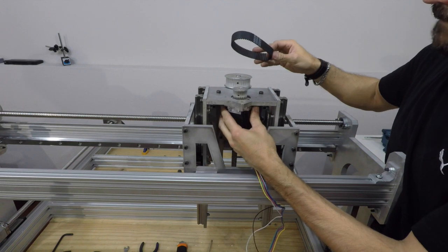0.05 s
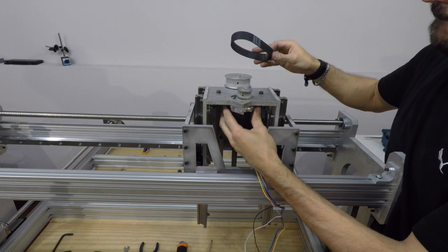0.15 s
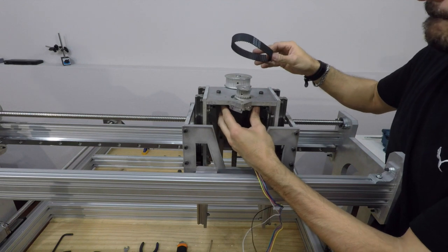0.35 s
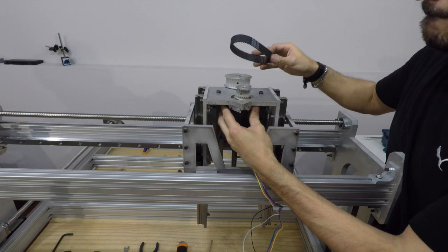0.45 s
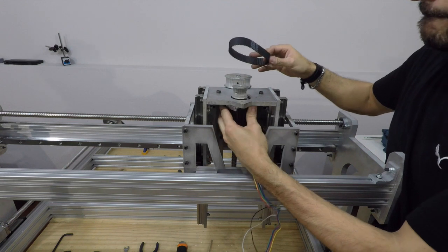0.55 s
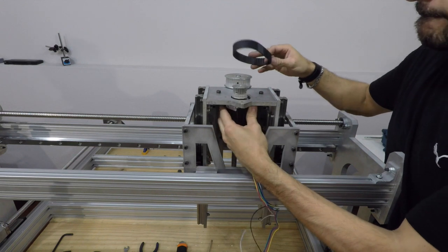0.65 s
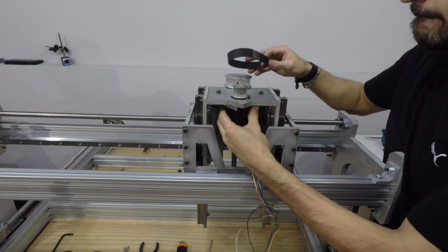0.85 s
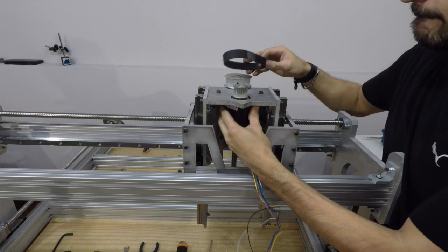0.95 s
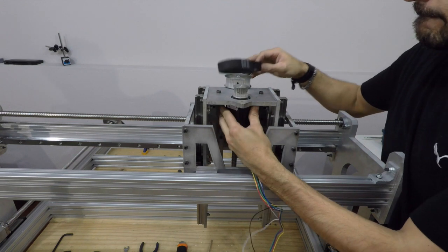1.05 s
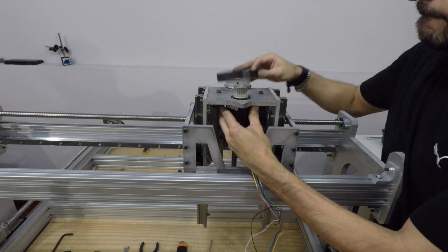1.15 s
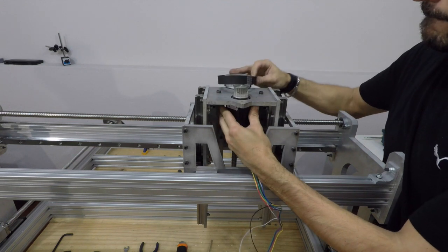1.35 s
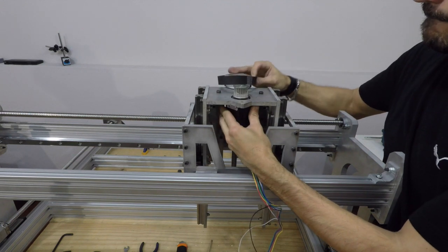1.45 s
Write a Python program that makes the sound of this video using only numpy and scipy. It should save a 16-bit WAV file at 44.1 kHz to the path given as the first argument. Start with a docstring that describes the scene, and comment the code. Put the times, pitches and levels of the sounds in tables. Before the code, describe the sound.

A motor knocks against its metal mount in a quick, uneven run of dull thumps and small clinks that grow weaker. The frame rings briefly after each, heard from a distance in an echoing workshop with a faint rumble.

```python
"""A bare workshop, one microphone, far enough off that the room outweighs the direct sound.
Hands shift a motor against an aluminium machine frame while a toothed belt is brought to its pulley.
Each contact cracks, clinks the mounting plate and sets the heavy frame ringing; the walls answer.
Fingers and the rubber belt brush the metal, mostly near the end, over a low room rumble and hiss."""
import sys
import numpy as np
from scipy import signal
from scipy.fft import rfft, irfft, next_fast_len
from scipy.io import wavfile

SR = 44100
rng = np.random.default_rng(int(sys.argv[2]) if len(sys.argv) > 2 else 0)


def transcribe(signal):
    """Save signal, clipped to [-1, 1], as a 16-bit WAV file at the path in sys.argv[1]."""
    frames = np.atleast_2d(signal).T
    limited = np.clip(frames, -1, 1)
    pcm = np.round(limited * 32767).astype(np.int16)
    wavfile.write(sys.argv[1], SR, pcm)


N = 66150
T = np.arange(int(.8 * SR)) / SR  # time within one event [s]
TOP_HZ = 15300


# Centres of the thump, body, clank, clink and edge bands: (frequency [Hz])
BAND_HZ = [90, 450, 1400, 3300, 8000]
# Motor against its mount: (time [s], thump [dB], body [dB], clank [dB], clink [dB], edge [dB],
# favoured resonance [Hz], its lift [dB])
CONTACTS = [ (0.1646, -27, -28.5, -27, -26.5, -43, 1480, 17),
            (0.1750, -0.5, -16, -30.5, -39, -73, 268, 9.5), (0.2049, -9.5, -13, -23, -28.5, -50, 4100, 3),
            (0.2200, -10, -26.5, -20.5, -47, -70, 2300, 12),
            (0.354, -14, -24, -22.5, -34.5, -51.5, 5130, 9),
            (0.377, -10, -15.5, -34.5, -38.5, -81, 290, 4.5),
            (0.5610, -21, -22, -22.5, -29.5, -49.5, 2950, 5.5),
            (0.584, -23, -14.5, -30, -30, -53.5, 1790, 9.5), (0.6000, -10.5, -26, -41, -59, -64, 129.4, 18),
            (0.6210, -19, -30.5, -40.5, -58, -80, 550, 16),
            (0.7841, -17.5, -23.5, -30.5, -40, -61, 943, 17.5),
            (0.8000, -22.5, -27.5, -39.5, -63, -84, 430, 12.5),
            (1.0151, -20.5, -22.5, -23.5, -38, -59, 1144, 12),
            (1.0184, -17, -17, -24, -45.5, -72, 2040, 16.5),
            (1.259, -27.5, -36, -44, -78.5, -67.5, 514, -2), ]

def motor_knocks():
    """The motor knocks on its mount; how hard and where it lands colours the sound and its ring."""
    out = np.zeros(N)
    for s, *bands_db, favoured_hz, lift_db in CONTACTS:
        crack, clink = contact_crack(), plate_clink()
        direct = near_echoes(crack) + clink
        tail = workshop_reverb(crack + amp(-5) * clink) + frame_ring()  # less plate reaches the room
        colour = [*zip(BAND_HZ, bands_db), (TOP_HZ, bands_db[-1] - 15)]
        lift = lambda hz: lift_db * bell(hz, favoured_hz, octaves=0.13)
        add(out, s, coloured(direct, lambda hz: along(colour, hz) + lift(hz)))
        # Only part of the lift lasts into the long ring.
        add(out, s, coloured(tail, lambda hz: along(colour, hz) + 0.71 * lift(hz)))
    return out


# Spectrum of metal meeting metal: (frequency [Hz], level [dB])
CRACK_SPECTRUM = [(25, -15.5), (70, -13.5), (130, -13), (190, -14), (260, -3), (500, 0), (880, -1.5),
                  (1200, 0.5), (1650, 4.5), (2450, -2.5), (3200, 2), (4500, 2), (6200, -1), (9000, -1.5)]

def contact_crack():
    """The impact itself, a burst of noise that dies quickly."""
    burst = rng.standard_normal(len(T)) * fade(t60=0.06) * rise(s=0.0012)
    return coloured(burst, lambda hz: along(CRACK_SPECTRUM, hz))


# Plate and pulley modes, the lowest being the motor rocking: (frequency [Hz], level [dB], t60 [s])
PLATE_MODES = [(91.3, -21.5, 0.048), (1136, -17.5, 0.057), (1222, -18, 0.075), (1482.5, -15.5, 0.059),
               (1653, -20, 0.057), (2028, -10.5, 0.035), (2700, -19, 0.031), (2939, -15, 0.054),
               (3257, -24, 0.051), (3870, -7, 0.038), (4120, -14, .03), (4740, -23, 0.053),
               (5160, -5.5, .045), (5520, -13, 0.032), (7070, -20, 0.066), (9540, -9.5, .035)]

def plate_clink():
    """The struck mounting plate and pulley ring bright and short."""
    return ring(PLATE_MODES, scatter_db=4.0) * rise(s=0.00099)


# Modes of the aluminium frame: (frequency [Hz])
FRAME_MODE_HZ = [73.2, 108, 136, 262, 341, 413, 453, 523, 580, 678, 775, 899, 1007, 1133, 1285, 1469, 1877,
                 2014, 2090, 2186, 2326]
# Strength of each of those modes: (level [dB])
FRAME_MODE_DB = [-25.5, -25.5, -31, -28, -27, -25.5, -25.5, -24.5, -27, -29.5, -33, -33.5, -33, -30, -26.5,
                 -30, -36, -27, -37, -37.5, -33.5]
# Ring time of the frame: (frequency [Hz], t60 [s])
FRAME_DECAY = [(73, 0.68), (108, 0.57), (136, 0.35), (262, 0.51), (350, 0.32), (900, 0.42), (1250, 0.52),
               (2200, 0.6)]

def frame_ring():
    """The heavy frame starts more slowly than the plate and rings on after it."""
    modes = [(hz, db, along(FRAME_DECAY, hz)) for hz, db in zip(FRAME_MODE_HZ, FRAME_MODE_DB)]
    return ring(modes, scatter_db=3.0) * rise(s=0.0031)


# Scuffs, faint at the microphone: (time [s], length [s], level [dB])
SCUFFS = [(0.116, .03, -66), (1.011, 0.036, -54.5), (1.227, 0.069, -62), (1.470, .03, -62)]
# Spectrum of the rubbing: (frequency [Hz], relative level [dB])
SCUFF_SPECTRUM = [(300, -10), (1200, -2), (2500, -18), (4000, 0), (5200, -7), (7000, -19), (15000, -42)]

def belt_scuffs():
    """Belt and fingers brush the metal in soft scuffs that swell and fade."""
    out = np.zeros(N)
    for s, length, db in SCUFFS:
        age = 4 * T / length  # 1 at the peak, a quarter of the way in
        swell = age * np.exp(1 - age)
        add(out, s, amp(db) * swell * noise(SCUFF_SPECTRUM)[:len(T)])
    return out


# Bench and nearest wall, heard just behind the direct sound: (delay [s], level [dB])
REFLECTIONS = [(.0032, -6), (.0055, -10.5), (.0088, -11)]

def near_echoes(x):
    """A sound with its first echoes, whose paths to the microphone vary a little for every contact."""
    out = x.copy()
    for delay, db in REFLECTIONS:
        add(out, delay * np.exp(.08 * rng.standard_normal()), amp(db) * x)
    return out


# Reverberation time of the workshop: (frequency [Hz], t60 [s])
ROOM_DECAY = [(100, 0.58), (300, 0.42), (800, 0.41), (2000, 0.41), (5000, 0.4), (12000, 0.39)]
# Swell of the reverberation: (frequency [Hz], build-up time [s])
ROOM_BUILD = [(100, 0.01), (450, 0.006), (1500, 0.0056), (5000, 0.0065)]
# Reverberation at the microphone: (frequency [Hz], level over the direct sound [dB])
ROOM_LEVEL = [(100, 10.5), (450, 12.5), (1400, 6.5), (3300, 2), (8000, -2.5)]

def workshop_reverb(x):
    """The bare room answers: the lows swell slowest, the treble dies soonest."""
    hz, t, bands = signal.stft(rng.standard_normal(len(T)), SR, nperseg=256)
    hz = hz[:, None]
    t60, build = along(ROOM_DECAY, hz), along(ROOM_BUILD, hz)
    envelope = np.exp(-np.log(1000) * t / t60) * (1 - np.exp(-t / build))
    unit_energy = np.sqrt(2 * np.log(1000) / (t60 * SR))
    bands = bands * envelope * unit_energy * amp(along(ROOM_LEVEL, hz))
    _, response = signal.istft(bands, SR, nperseg=256)
    return signal.fftconvolve(x, response)[:len(T)]


# The workshop's background: (frequency [Hz], relative level [dB])
ROOM_TONE_SPECTRUM = [(15, -58), (25, 8), (86, -5), (131, -5), (196, -12.5), (264, -10), (301, -14),
                      (344, -15.5), (404, -16), (673, -23.5), (811, -24), (1030, -25.5), (1240, -27),
                      (2780, -31.5), (15000, -45)]

def room_tone():
    """Steady low rumble and faint hiss around the microphone."""
    return amp(-49.5) * noise(ROOM_TONE_SPECTRUM)


def amp(db):
    """Decibels to gain."""
    return 10 ** (np.asarray(db) / 20)


def along(points, hz):
    """(Hz, value) points read on a log axis."""
    freqs, values = np.transpose(points)
    return np.interp(np.log(hz + 1), np.log(freqs + 1), values)


def bell(hz, centre_hz, octaves):
    """Bell curve of height 1 on a pitch axis."""
    return np.exp(-.5 * (np.log2((hz + 1) / centre_hz) / octaves) ** 2)


def fade(t60):
    """Exponential decay of 60 dB in t60 seconds."""
    return np.exp(-np.log(1000) * T / t60)


def rise(s):
    """Soft onset with time constant s."""
    return 1 - np.exp(-T / s)


def ring(modes, scatter_db):
    """Decaying modes, each a little stronger or weaker at every blow."""
    return sum(amp(db + scatter_db * rng.standard_normal()) * fade(t60) * np.sin(2 * np.pi * hz * T)
               for hz, db, t60 in modes)


def coloured(x, db_of_hz):
    """Causal (minimum-phase) filter with the given gain curve."""
    m = 2 * next_fast_len(len(x))
    cepstrum = irfft(np.log(amp(db_of_hz(np.fft.rfftfreq(m, 1 / SR)))), m)
    cepstrum[1:m // 2] *= 2
    cepstrum[m // 2 + 1:] = 0
    return irfft(rfft(x, m) * np.exp(rfft(cepstrum)), m)[:len(x)]


def noise(spectrum):
    """Coloured noise of rms 1."""
    gain = amp(along(spectrum, np.fft.rfftfreq(N, 1 / SR)))
    x = irfft(rfft(rng.standard_normal(N)) * gain, N)
    return x / x.std()


def add(out, s, x):
    """Mix x into out at time s."""
    part = out[round(s * SR):][:len(x)]
    part += x[:len(part)]


def scene():
    """Knocks and scuffs over the room tone, in mono."""
    return (motor_knocks() + belt_scuffs() + room_tone())[None]


def record(dry):
    """The camera's microphone channel keeps nothing above TOP_HZ."""
    m = next_fast_len(N + SR // 2)
    passband = np.fft.rfftfreq(m, 1 / SR) < TOP_HZ
    return irfft(rfft(dry, m) * passband, m)[:, :N]


dry = scene()
out = record(dry)
transcribe(out)
```